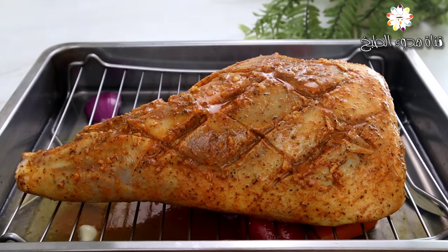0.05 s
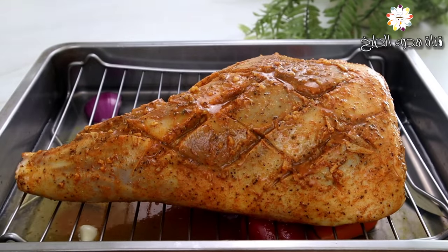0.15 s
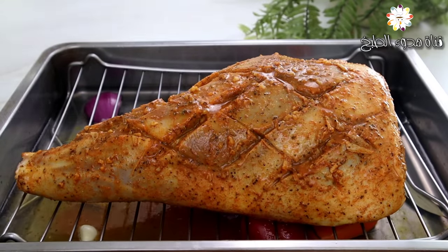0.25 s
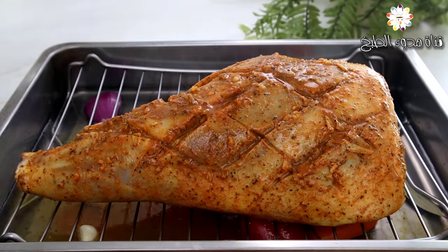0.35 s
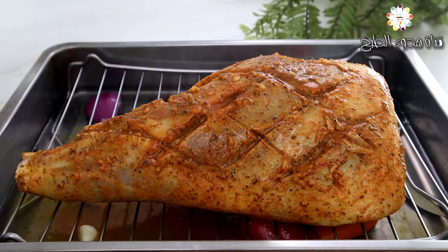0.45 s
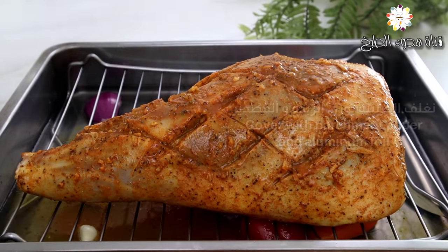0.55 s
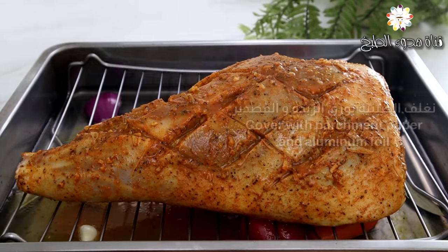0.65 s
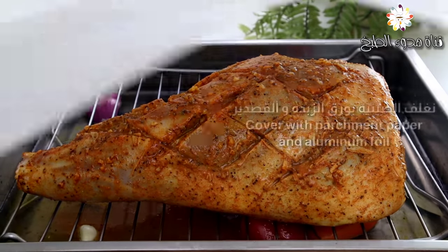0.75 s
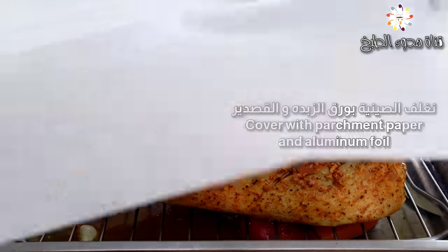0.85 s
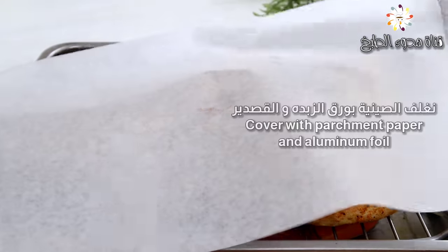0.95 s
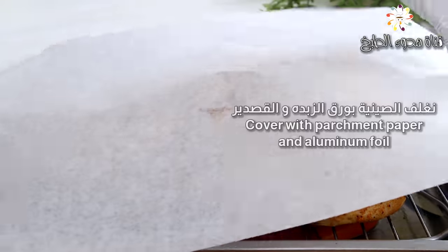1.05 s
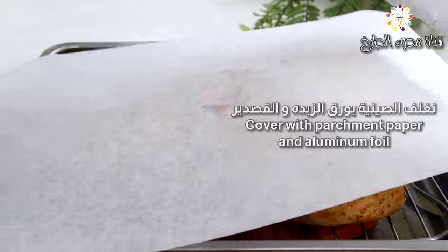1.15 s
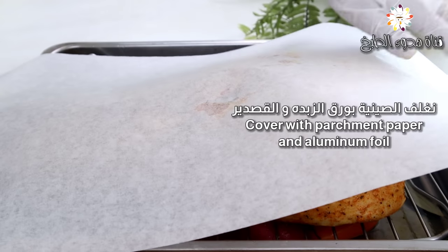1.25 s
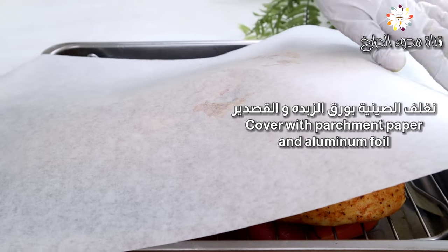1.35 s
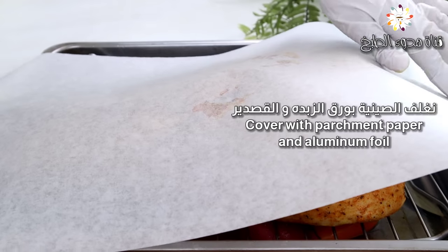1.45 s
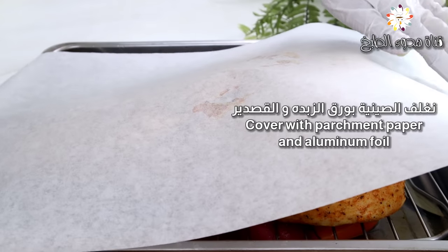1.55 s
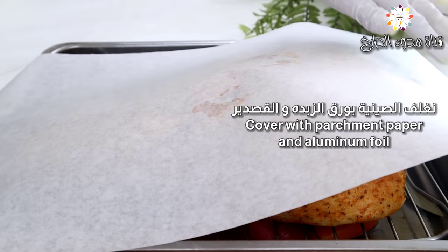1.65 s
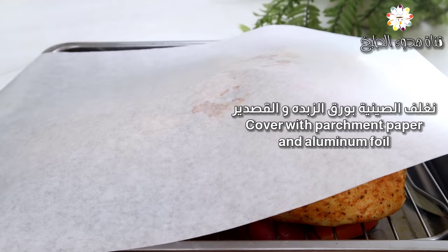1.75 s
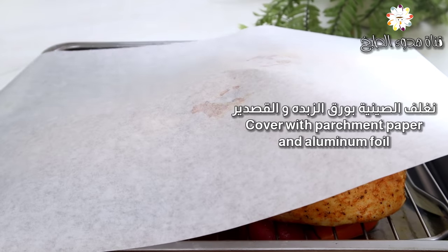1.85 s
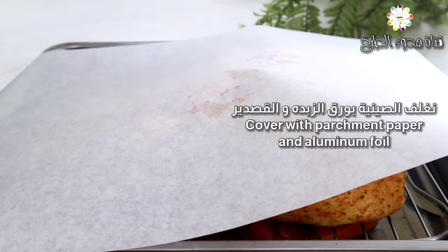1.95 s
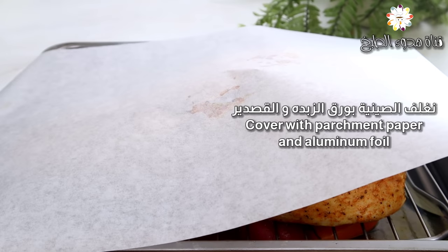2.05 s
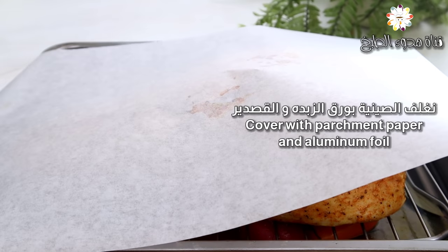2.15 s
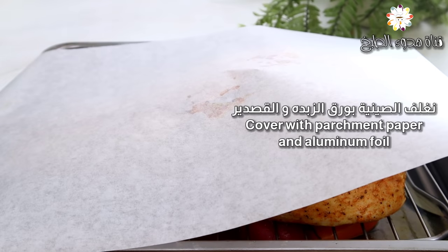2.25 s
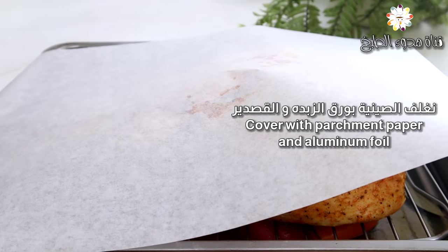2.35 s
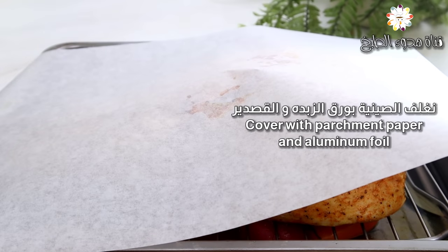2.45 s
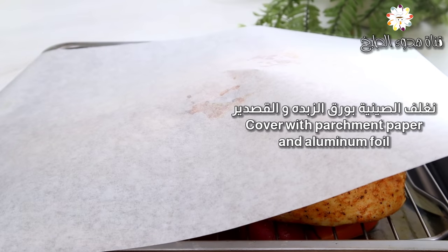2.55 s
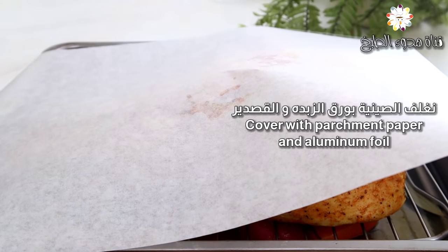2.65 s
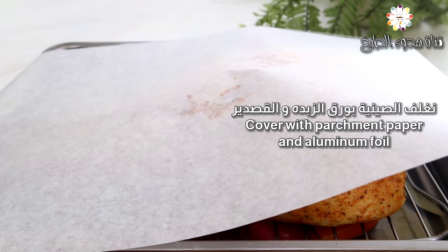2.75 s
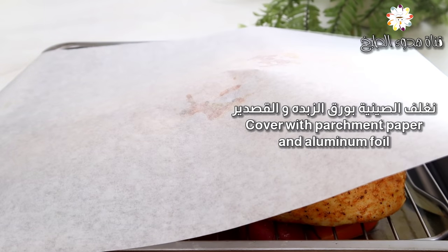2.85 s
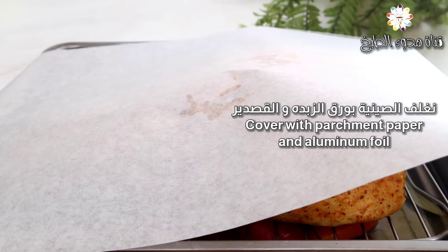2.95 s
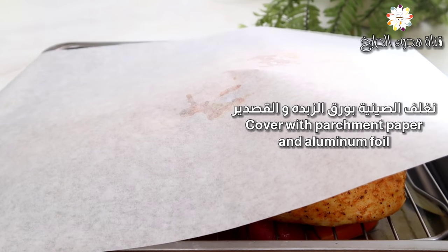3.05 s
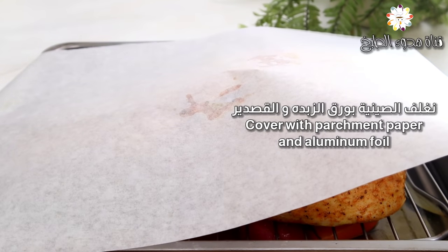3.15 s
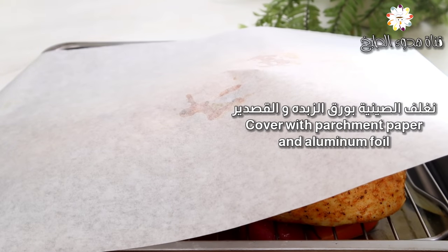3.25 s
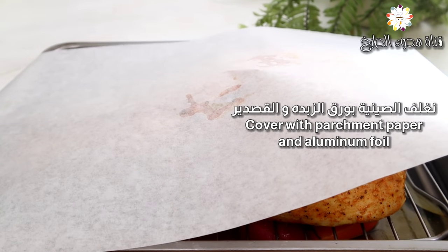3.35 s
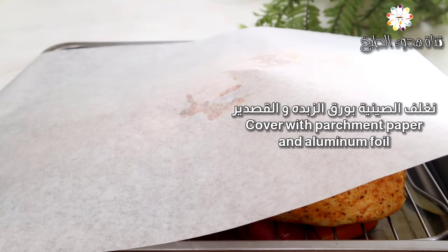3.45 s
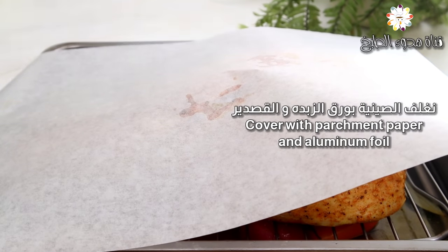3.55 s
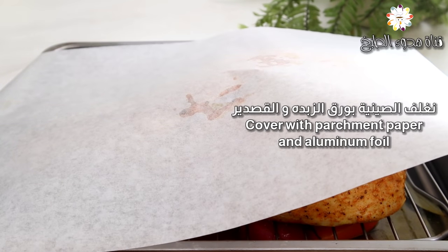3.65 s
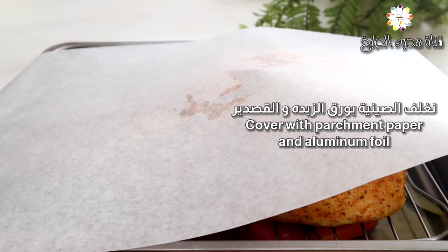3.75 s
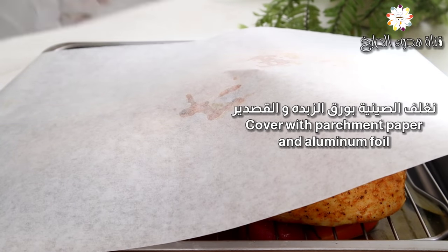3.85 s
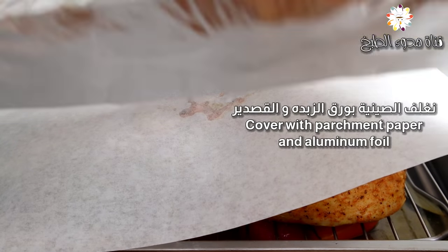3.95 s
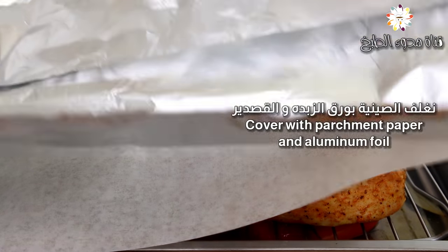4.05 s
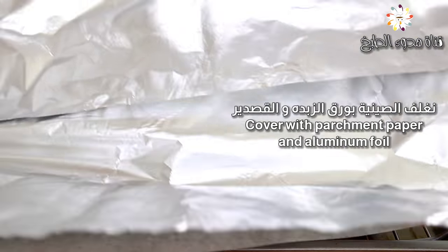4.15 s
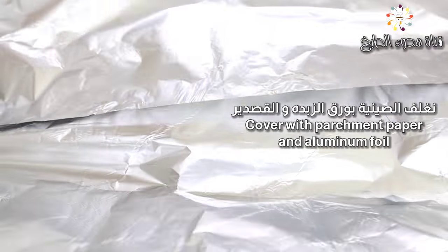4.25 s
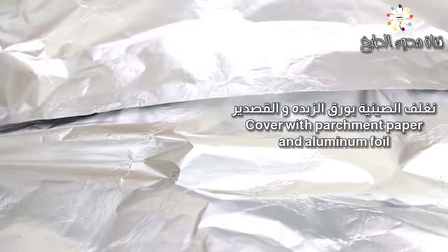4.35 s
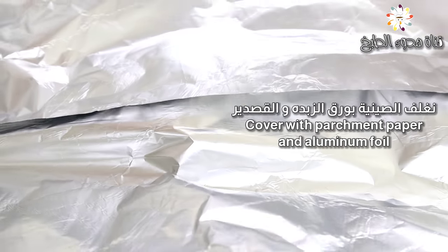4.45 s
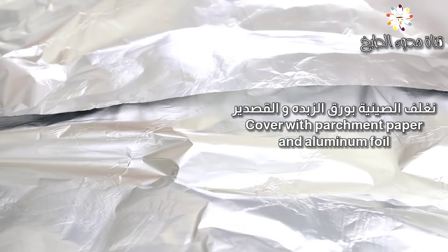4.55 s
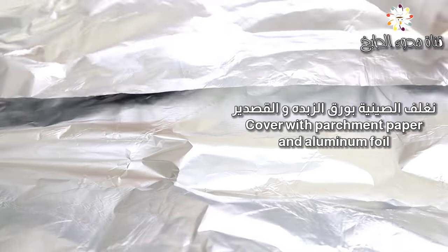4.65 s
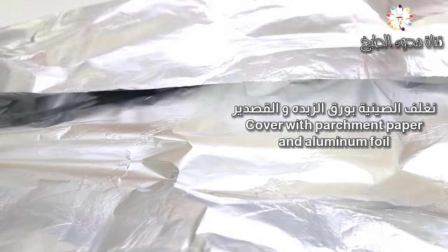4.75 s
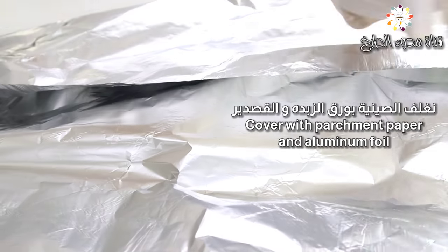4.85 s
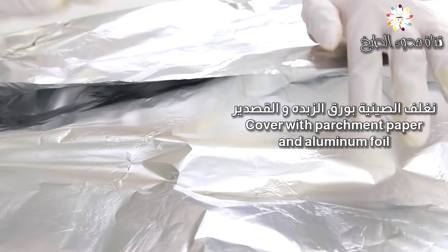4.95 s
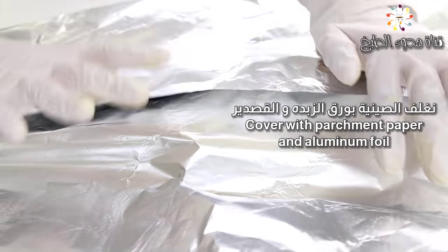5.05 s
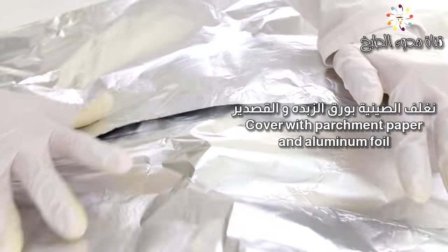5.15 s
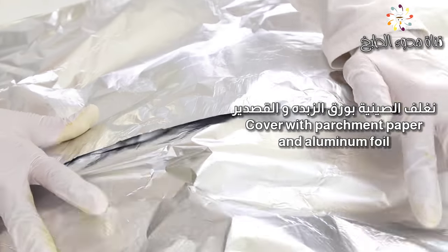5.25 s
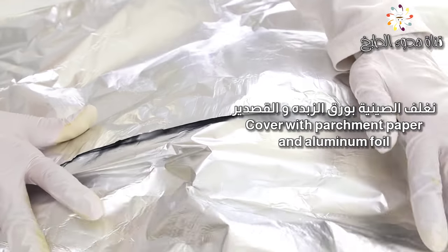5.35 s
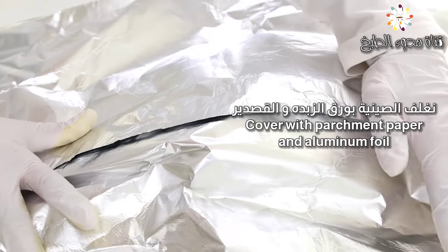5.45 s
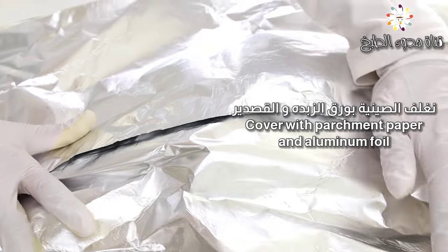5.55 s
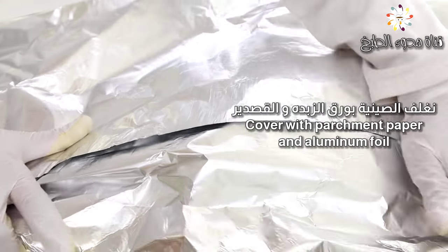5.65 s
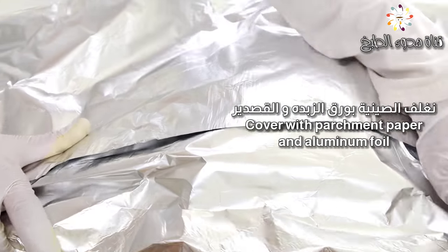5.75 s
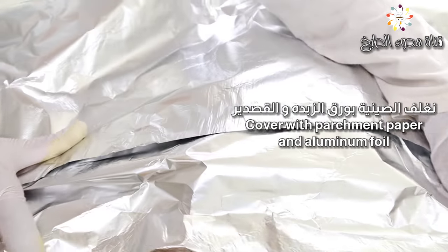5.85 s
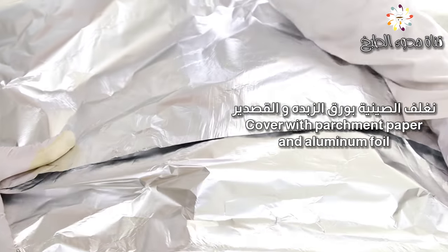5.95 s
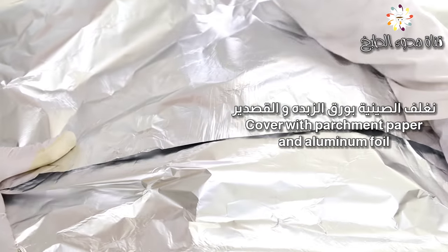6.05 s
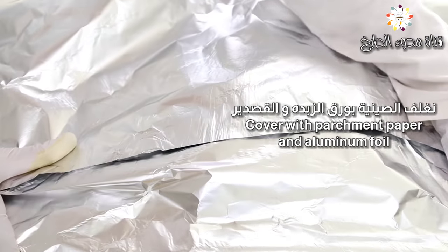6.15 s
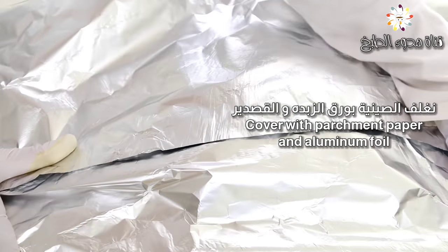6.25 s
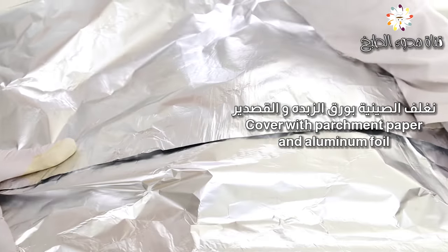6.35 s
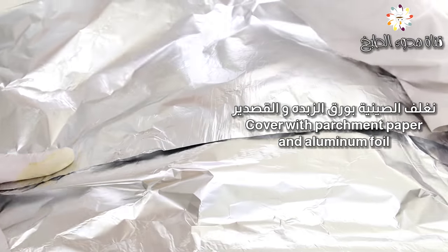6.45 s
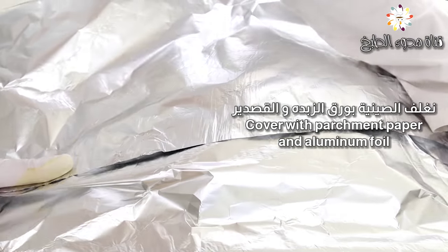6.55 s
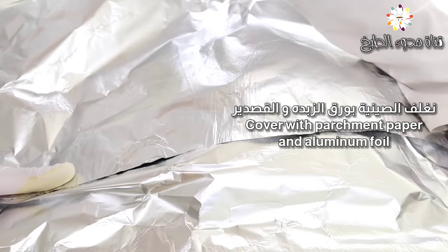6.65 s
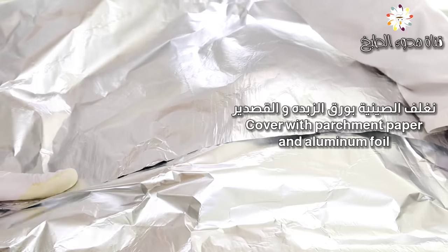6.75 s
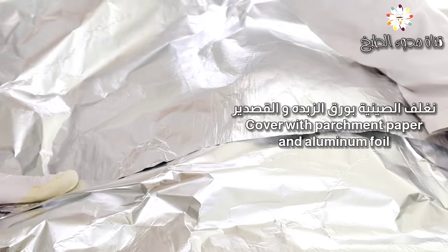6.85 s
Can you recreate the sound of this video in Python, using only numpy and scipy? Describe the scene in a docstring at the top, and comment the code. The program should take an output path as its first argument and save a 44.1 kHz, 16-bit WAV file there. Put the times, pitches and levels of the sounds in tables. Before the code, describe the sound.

In a quiet kitchen with a faint appliance hum, parchment paper is spread over a roasting pan with dry, snappy crackles, strongest around one second. It settles almost to silence, then aluminium foil starts with faint thin ticks, grows bright and metallic, and ends in loud dense crumpling with pops and dull hand knocks. One close microphone, little reverberation.

```python
"""Parchment paper is spread over a roasting pan, then thin aluminium foil is unrolled and pressed down by hand.
Each crease buckles with a snap, a noise burst whose treble rises before its slower low bending waves.
Countless small creases merge into a rustle, with sharp pops, ringing facets, dull knocks and table rumble.
Throughout, a quiet kitchen with a humming appliance answers; one close microphone."""
import sys
import numpy as np
from scipy import signal
from scipy.fft import rfft, irfft, next_fast_len
from scipy.io import wavfile
from scipy.ndimage import uniform_filter1d, map_coordinates

SR = 44100
rng = np.random.default_rng(int(sys.argv[2]) if len(sys.argv) > 2 else 0)


def digitize_waveform(pressure):
    """Quantize a signal to 16-bit integers and store it at the path in sys.argv[1].

    Rows of a 2-D input are taken as channels; values are limited to [-1, 1].
    """
    field = np.atleast_2d(pressure).T
    bounded = np.clip(field, -1, 1)
    quanta = np.round(bounded * 32767).astype(np.int16)
    wavfile.write(sys.argv[1], SR, quanta)


N = 304731  # length in samples

# Parchment creases. Each row: start in seconds, treble in dB, body in dB, nominal 60 dB decay in seconds.
PAPER_CREASES = [(0.0743, -71, -60, 0.023), (0.125, -65.5, -65, 0.025), (0.1501, -46.5, -59, .03),
                 (0.195, -43.5, -35, 0.027), (0.218, -55, -41, .03), (0.258, -54, -41, 0.038),
                 (0.3005, -46, -38, 0.024), (0.3104, -43, -37, 0.035), (0.3257, -45, -31, 0.028),
                 (0.3581, -48, -44, .025), (0.3736, -43.5, -31, 0.029), (0.4017, -50, -56, 0.04),
                 (0.4585, -45.5, -40, .031), (0.4886, -39.5, -27.5, 0.015), (0.5261, -44, -34.5, .067),
                 (0.5453, -37, -30.5, 0.072), (0.597, -52, -38, 0.054), (0.6154, -53, -32.5, 0.026),
                 (0.6533, -38.5, -31, 0.03), (0.6797, -42, -37, 0.085), (0.7017, -42.5, -27.5, 0.038),
                 (0.7577, -51, -58, .039), (0.7864, -45, -45, 0.026), (0.8029, -49, -40, 0.053),
                 (0.8235, -46, -40, .04), (0.8412, -39, -28.5, .033), (0.9185, -61, -44, 0.052),
                 (0.9464, -57, -43, 0.041), (0.9982, -46.5, -49, 0.015), (1.0111, -51, -36.5, 0.023),
                 (1.0434, -46, -30, 0.093), (1.0547, -33.5, -27, .05), (1.0687, -30, -21.5, 0.032),
                 (1.0839, -37, -30, .043), (1.1114, -49, -29, 0.03), (1.127, -33, -29, 0.061),
                 (1.144, -40, -35, .07), (1.1872, -45, -33.5, 0.14), (1.2044, -36.5, -30, 0.046),
                 (1.2209, -33.5, -27.5, 0.035), (1.239, -62, -34, .033), (1.3027, -43, -30.5, 0.017),
                 (1.3384, -60, -56, .04), (1.4154, -81, -52, .025), (1.4248, -59, -37.5, 0.023),
                 (1.4574, -66, -45, .023), (1.4956, -52.5, -37.5, 0.044), (1.5514, -70, -42, 0.02),
                 (1.598, -68, -54, 0.024), (1.6322, -57, -60, 0.036), (1.6598, -62, -45.5, 0.073),
                 (1.726, -62, -64, 0.031), (1.7509, -57, -37.5, 0.046), (1.7588, -62, -43, 0.013),
                 (1.772, -56, -43, 0.043), (1.7864, -67, -45, 0.035), (1.8158, -75, -47.5, 0.034),
                 (1.845, -70, -41, 0.014), (1.8954, -49.5, -40.5, 0.023), (2.071, -75, -51.5, 0.037)]
# Foil creases. Each row: start in seconds, treble in dB, body in dB, nominal 60 dB decay in seconds.
FOIL_CREASES = [(2.594, -68, -65, .08), (2.727, -60, -52, 0.051), (2.8324, -60, -55, 0.1),
                (2.8539, -56, -56, 0.075), (2.9814, -63, -56, 0.078), (3.0078, -62, -56.5, 0.11),
                (3.199, -56, -54, 0.12), (3.3078, -54, -49, 0.15), (3.4112, -49, -49, 0.18),
                (3.484, -52, -51, 0.078), (3.531, -56, -65, 0.11), (3.638, -59, -52, 0.16),
                (3.7324, -60, -49.5, 0.22), (3.824, -58, -53, 0.11), (3.93, -57, -43, 0.06),
                (4.0458, -46.5, -42, 0.12), (4.1118, -47, -46, 0.22), (4.1408, -44, -43, 0.053),
                (4.1824, -42.5, -42, 0.048), (4.3054, -40, -35.5, 0.082), (4.3614, -34, -25, 0.05),
                (4.4495, -31.5, -32, .078), (4.513, -31.5, -38, .07), (4.5349, -39.5, -39, 0.2),
                (4.6136, -40.5, -60, 0.22), (4.71, -41, -41.5, 0.19), (4.8342, -43, -54, .068),
                (4.8484, -44.5, -42, 0.18), (4.9764, -42.5, -38.5, 0.22), (5.1305, -40, -42, 0.053),
                (5.159, -39, -39, 0.14), (5.2347, -35.5, -31.5, 0.25), (5.2887, -35, -25.5, 0.068),
                (5.322, -28, -31.5, 0.22), (5.3634, -22.5, -27, 0.07), (5.4019, -27.5, -26, 0.16),
                (5.4941, -29.5, -27.5, 0.2), (5.5312, -30.5, -26.5, 0.19), (5.5905, -25, -22, 0.043),
                (5.609, -35, -28, 0.17), (5.67, -27, -22, .08), (5.6945, -27, -29, 0.066),
                (5.7594, -34, -32, 0.13), (5.7865, -41, -26, 0.3), (5.9217, -31.5, -29, 0.13),
                (5.9684, -25.5, -26, .075), (5.9913, -31, -26, 0.065), (6.0547, -30, -23.5, 0.12),
                (6.102, -29, -24, 0.041), (6.1854, -32.5, -24.5, 0.081), (6.2764, -39, -32, 0.11),
                (6.33, -37, -23.5, 0.068), (6.3895, -40, -32, 0.076), (6.4564, -42, -28.5, 0.035),
                (6.4948, -34, -24.5, .094), (6.5876, -37.5, -33, 0.19), (6.6524, -29, -50, .037),
                (6.761, -30, -31, 0.031), (6.8498, -31.5, -28, 0.081)]
# Tight single creases that pop. Each row: start in seconds, drive in dB before the two colours' gains.
TIGHT_POPS = [(0.1501, -32), (0.2987, -32), (0.4569, -26.5), (0.6799, -29), (0.7023, -21), (0.9183, -43),
              (1.0111, -28), (1.1226, -13), (1.127, -22), (1.8452, -55), (3.463, -31), (5.1314, -32),
              (5.531, -16), (5.672, -9), (5.799, -24), (6.1017, -16), (6.423, -16), (6.507, -20),
              (6.654, -24), (6.762, -19), (6.79, -9.5)]
# Hand pressing a sheet onto the pan. Each row: start in seconds, drive in dB.
HAND_KNOCKS = [(0.3737, -43.5), (0.948, -47), (1.24, -40.5), (1.66, -48.5), (1.787, -48.5), (2.072, -53),
               (4.36, -34), (5.425, -32), (5.531, -31), (5.671, -22.5), (5.693, -28), (6.102, -24),
               (6.251, -28.5), (6.33, -30), (6.61, -31.5)]
# Rustle, parchment then foil. Each row: time in seconds, body in dB, treble in dB.
RUSTLE_LEVELS = [(0.0, -55, -68), (0.3, -51, -63), (0.5, -53.5, -67), (0.68, -44.5, -59.5),
                 (0.9, -58.5, -72), (1.06, -46.5, -62), (1.17, -37, -56), (1.34, -55, -75),
                 (1.63, -60.5, -70), (1.86, -72, -90), (2.45, -82, -95), (2.55, -73.5, -83.5),
                 (2.91, -60, -69), (3.13, -68, -74.5), (3.19, -57.5, -63.5), (3.41, -51, -61.5),
                 (3.66, -54.5, -63), (3.96, -56.5, -77), (4.03, -59, -71), (4.2, -49.5, -61.5),
                 (4.38, -38.5, -43), (4.78, -45.5, -60.5), (4.96, -52, -64), (5.08, -56.5, -73),
                 (5.17, -41, -44.5), (5.4, -31.5, -37), (5.47, -34, -39.5), (5.72, -36, -43.5),
                 (5.84, -30.5, -34), (5.95, -33, -39), (6.4, -32.5, -40.5), (6.68, -41, -50),
                 (6.74, -36, -49), (6.91, -37, -41.5)]
# Sheets flapping as hands press them. Each row: time in seconds, flapping in dB.
PRESSING_LEVELS = [(0.0, -74.5), (0.37, -62), (0.9, -64.5), (1.17, -50), (1.34, -60), (2.1, -72),
                   (3.15, -74.5), (3.96, -68), (4.12, -65), (4.38, -48.5), (4.78, -57.5), (5.08, -59),
                   (5.42, -38), (5.68, -40), (6.3, -37), (6.67, -45.5), (6.91, -39.5)]

# Spectra of a buckling sheet, from the highest treble down to the thud; parchment has its own treble and body.
# Each row: frequency in Hz, relative density in dB per Hz.
FIZZ_COLOUR = [(8000, -91.5), (10500, -30), (12000, -5), (13500, -1), (15000, -6), (17000, -7)]
FOIL_TREBLE = [(1500, -90), (3000, -71), (4000, -11), (5500, -4), (7000, -0.5), (9500, 2), (11500, -1.5),
               (13500, -7), (17000, -16)]
PAPER_TREBLE = [(1500, -88), (3000, -34), (4000, 1), (5500, -2.5), (8000, 0), (10500, -2), (13000, -12.5),
                (17000, -32)]
FOIL_BODY = [(300, -75), (750, -15), (1100, -5), (1700, -2), (2500, -1), (3100, -0.5), (3600, -6),
             (4300, -12), (6500, -20.5), (12000, -60)]
PAPER_BODY = [(300, -81), (750, -16), (1100, -7.5), (1800, -2.5), (2500, -2), (3200, -3), (4300, -14.5),
              (6500, -25), (12000, -79)]
THUD_COLOUR = [(60, -52), (150, -16.5), (220, -12), (320, -9.5), (550, -4.5), (850, -3), (1300, -8),
               (4000, -68)]

# Thinner colour of the foil. Each row: frequency in Hz, gain in dB.
THIN_GAIN = [(500, -0.5), (1200, -2), (2200, -2.5), (3800, 1), (5500, 2), (11000, -1)]
# Stretch in which the foil sounds thinner. Entries: start in seconds, end in seconds.
THIN_SPAN = (2.5, 4.03)
# Reverberation of the kitchen. Each row: frequency in Hz, 60 dB decay in seconds.
KITCHEN_DECAY = [(200, 0.16), (2000, 0.19), (10000, 0.23)]
# Spectrum of the kitchen air. Each row: frequency in Hz, relative density in dB per Hz.
AIR_COLOUR = [(15, -40), (30, 2), (60, 1), (150, -3), (300, -8.5), (800, -31.5), (1600, -6.5), (2300, -42),
              (5000, -29), (15000, -31)]
# Appliance motor lines. Each row: mean frequency in Hz, middle level in dB rms.
MOTOR_LINES = [(59, -79), (119, -76.5), (162, -82), (237, -80)]

STRAY_POPS = 260  # fainter pops at random times
STRAY_DB, STRAY_SPREAD_DB = 20, 12  # loudest drive over the rustle's treble level; depth of the faintest below it
KNOCK_RISE_S, KNOCK_T60_S = 0.0021, 0.061  # time constant of the rise; 60 dB decay
JOLT_DB = -17.5  # table rumble relative to the flapping
TOP_HZ = 15750  # band limit


def amp(db):
    """Level to amplitude: 20 dB is a factor of ten."""
    return 10 ** (np.asarray(db) / 20)


def unit(x):
    """Normalisation of energy: x at rms 1."""
    return x / np.sqrt(np.mean(x ** 2) + 1e-20)


def along(points, hz):
    """Interpolation on a logarithmic axis of (Hz, value) points."""
    f, v = np.transpose(points)
    return np.interp(np.log(hz + 1), np.log(f + 1), v)


def level(rows):
    """Linear interpolation in time: one curve per sample for each column after the time."""
    s, *columns = np.transpose(rows)
    return [np.interp(np.arange(N) / SR, s, column) for column in columns]


def wobble(rate):
    """Slow random fluctuation: a spline through random knots, rate of them a second."""
    return map_coordinates(rng.standard_normal(int(N * rate / SR) + 4), [np.arange(N) * rate / SR])


def filtered(x, response):
    """Linear filtering: the spectrum of x times a response of frequency."""
    size = next_fast_len(N + 8192)
    spectrum = rfft(x, size) * response(np.fft.rfftfreq(size, 1 / SR))
    return irfft(spectrum, size)[..., :N]


def coloured(x, colour):
    """Spectral shaping by a response of rms 1, which keeps the power of white noise."""
    return filtered(x, lambda hz: unit(amp(along(colour, hz))))


def snaps(table, treble, body, fizz_db, thud_db, onset, lag, sharp, hold):
    """Dispersion of bending waves: after a click, a crease's slow low waves rise later and last longer."""
    t = np.arange(SR // 4) / SR
    layers = np.zeros((4, N + SR))  # fizz, treble, body, thud
    rise = np.array([[onset], [onset], [lag], [1.4 * lag]])  # time constants, s
    for s, treble_db, body_db, t60 in table:
        life = np.clip(t60, .008, .2) * np.array([[.6], [1], [1.3], [1.5]])
        # hold over 1 lets the burst linger before it falls
        burst = (1 - np.exp(-t / rise)) * amp(-60 * (t / life) ** hold)
        click = sharp * amp(-60 * t / 0.0013)
        gain = amp([[treble_db + fizz_db], [treble_db], [body_db], [body_db + thud_db]])
        noise = rng.standard_normal((4, len(t)))
        layers[:, round(s * SR):][:, :len(t)] += gain * (burst + click) * noise
    colours = (FIZZ_COLOUR, treble, body, THUD_COLOUR)
    return sum(coloured(layer[:N], colour) for layer, colour in zip(layers, colours))


def rustle():
    """Superposition of small creases: they come in clumps, few large among many tiny, and die quickly."""
    (body_db, treble_db), (flap_db,) = level(RUSTLE_LEVELS), level(PRESSING_LEVELS)
    draw = rng.random((2, N))
    happens = draw[0] < 600 / SR * amp(3 * wobble(18))  # about 600 a second
    starts = happens * amp(3.3 * draw[1] ** 3)
    t = np.arange(SR // 10) / SR
    layers = []
    # colour, 60 dB decay in s, steady share of the power
    for colour, t60, smooth in ((FIZZ_COLOUR, .008, .3), (FOIL_TREBLE, .012, .45),
                                (FOIL_BODY, .02, .6), (THUD_COLOUR, .05, .8)):
        power = np.abs(signal.fftconvolve(starts ** 2, amp(-120 * t / t60))[:N])
        power /= uniform_filter1d(power, SR // 4) + 1e-9
        grain = np.sqrt(smooth + power) * amp(0.53 * wobble(13)) * rng.standard_normal(N)
        layers.append(unit(coloured(grain, colour)))
    fizz, foil_treble, foil_body, flapping = layers

    def as_paper(x, paper, foil):
        return unit(filtered(x, lambda hz: amp(along(paper, hz) - along(foil, hz))))

    # the foil takes over from the duller parchment
    foil = np.clip((np.arange(N) / SR - 2.3) / 0.17, 0, 1)
    treble = foil * foil_treble + (1 - foil) * as_paper(foil_treble, PAPER_TREBLE, FOIL_TREBLE)
    body = foil * foil_body + (1 - foil) * as_paper(foil_body, PAPER_BODY, FOIL_BODY)
    facets = amp(-15) * amp((body_db + flap_db) / 2) * pings(count=1400)
    # harder handling brings out the highest treble
    fizz = amp(-49 + 1.8 * (treble_db + 36.5)) * fizz
    return fizz + amp(treble_db) * treble + amp(body_db) * body + amp(flap_db) * flapping + facets


def pings(count):
    """Damped resonance: small flat facets ring at their own pitch, decaying by the cycle; rms 1."""
    draw = rng.random((count, 3))  # start, pitch, strength
    hz = 350 * (3400 / 350) ** draw[:, 1:2]
    t = np.arange(SR // 25) / SR
    decay = amp(13.5 * draw[:, 2:] - 60 * t * hz / 45)  # 60 dB in 45 cycles
    ring = decay * np.sin(2 * np.pi * hz * t) * (1 - np.exp(-t * hz / 0.87))
    at = (draw[:, :1] * N).astype(int) + np.arange(len(t))
    return unit(np.bincount(at.ravel(), ring.ravel(), N + SR)[:N])


def pops():
    """Impulsive excitation: a tight crease cracks briefly, bright and with body; fainter ones are strewn about."""
    t = np.arange(SR // 100) / SR
    crack = np.zeros(N + SR)
    draw = rng.random((STRAY_POPS, 2))
    at = (draw[:, 0] * N).astype(int)
    stray_db = level(RUSTLE_LEVELS)[1][at] + STRAY_DB - STRAY_SPREAD_DB * np.sqrt(draw[:, 1])
    for s, db in [*TIGHT_POPS, *zip(at / SR, stray_db)]:
        signs = rng.choice([-1, 1], len(t))
        crack[round(s * SR):][:len(t)] += amp(db - 60 * t / 0.0023) * signs
    crack = crack[:N]
    return amp(-16.0) * coloured(crack, FOIL_TREBLE) + amp(-7.5) * coloured(crack, FOIL_BODY)


def folds(x, patchy_db):
    """Spectral variation: the sheet's colour changes from fold to fold, in brief patches of random gain."""
    z = signal.stft(x, nperseg=256)[2]
    field = uniform_filter1d(rng.standard_normal(z.shape), size=3, axis=0)  # over frequency
    field = uniform_filter1d(field, size=8, axis=1)  # over time
    return signal.istft(z * amp(patchy_db * unit(field)), nperseg=256)[1][:N]


def thinned(x):
    """Spectral tilt: for a stretch of the creasing the foil sounds thinner, with less near 1-2 kHz and more
    around 4-5 kHz."""
    t = np.arange(N) / SR
    within = 1. * (t > THIN_SPAN[0]) * (t < THIN_SPAN[1])
    blend = uniform_filter1d(within, size=2000)
    return (1 - blend) * x + blend * filtered(x, lambda hz: amp(along(THIN_GAIN, hz)))


def knocks():
    """Soft impact: a hand pressing onto the pan makes a short low noise burst with a gradual start."""
    t = np.arange(SR // 10) / SR
    out = np.zeros(N + SR)
    for s, db in HAND_KNOCKS:
        shape = amp(db - 60 * t / KNOCK_T60_S) * (1 - np.exp(-t / KNOCK_RISE_S))
        out[round(s * SR):][:len(t)] += shape * rng.standard_normal(len(t))
    return coloured(out[:N], THUD_COLOUR)


def bumps():
    """Structure-borne sound: the push jolts pan and table, a lumpy low rumble that follows the flapping."""
    lumps = amp(3.2 * wobble(14)) * rng.standard_normal(N)
    # Hz, relative dB per Hz
    rumble = coloured(lumps, [(12, -39), (30, -4.5), (60, 5), (140, -1.5), (260, -16.5), (600, -92)])
    return amp(level(PRESSING_LEVELS)[0] + JOLT_DB) * unit(rumble)


def room(x):
    """Reverberation: a diffuse noise tail in which each frequency dies at its own speed."""
    hz, t, z = signal.stft(rng.standard_normal(SR // 2), SR, nperseg=256)
    decay = amp(-60 * t / along(KITCHEN_DECAY, hz)[:, None])
    tail = signal.istft(z * decay, SR, nperseg=256)[1]
    delayed = np.pad(x, (300, 0))  # samples before the answer begins
    return signal.fftconvolve(delayed, tail / np.linalg.norm(tail))[:N]


def kitchen_air():
    """Stationary noise with tones: steady room air and the slightly unsteady lines of an appliance motor."""
    out = amp(-68.5) * unit(coloured(rng.standard_normal(N), AIR_COLOUR))
    for hz, db in MOTOR_LINES:
        turns = np.cumsum(hz * (1 + 0.0092 * wobble(9))) / SR
        out += amp(db + 2.3 * wobble(7)) * np.sqrt(2) * np.sin(2 * np.pi * turns)
    return out


def scene():
    """Superposition of direct sound from the close sheets, their reverberation, the rumble and the room air."""
    # onset and lag are rise time constants in s
    paper = snaps(PAPER_CREASES, PAPER_TREBLE, PAPER_BODY, fizz_db=-11.5, thud_db=-13,
                  onset=0.00017, lag=0.0037, sharp=0.82, hold=1.14)
    foil = snaps(FOIL_CREASES, FOIL_TREBLE, FOIL_BODY, fizz_db=-6, thud_db=-12.5,
                 onset=0.0028, lag=0.0063, sharp=1.0, hold=1.024)
    creasing = folds(paper + foil + rustle(), patchy_db=1.79)
    sheets = thinned(creasing + pops()) + knocks()
    return (sheets + amp(-14.5) * room(sheets) + bumps() + kitchen_air())[None]


def record(dry):
    """Band limitation: the response falls to nothing over 300 Hz around the limit."""
    return filtered(dry, lambda hz: np.clip((TOP_HZ + 150 - hz) / 300, 0, 1) ** 2)


dry = scene()
out = record(dry)
digitize_waveform(out)
```